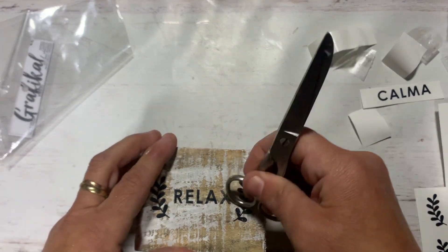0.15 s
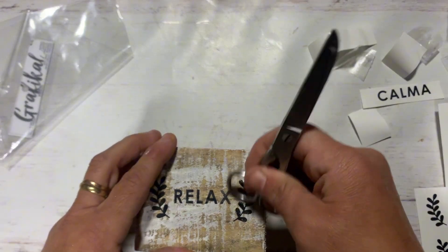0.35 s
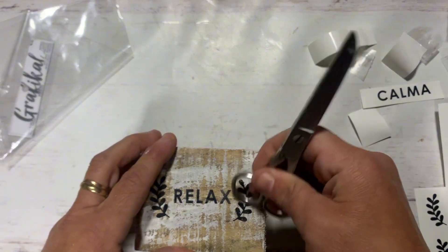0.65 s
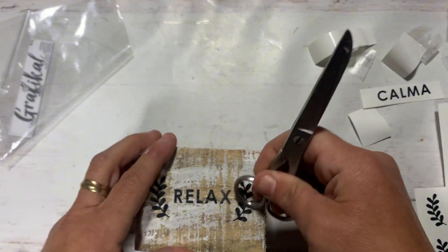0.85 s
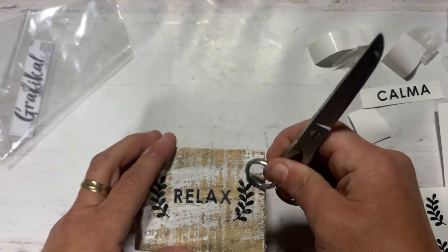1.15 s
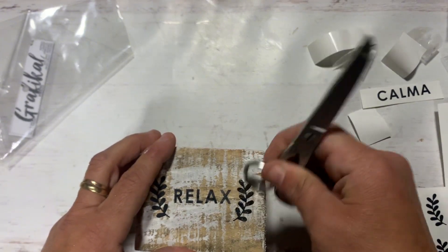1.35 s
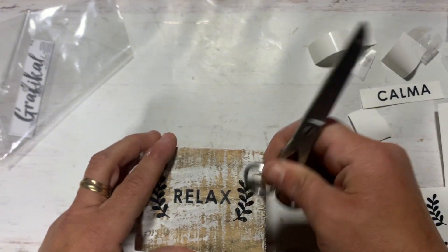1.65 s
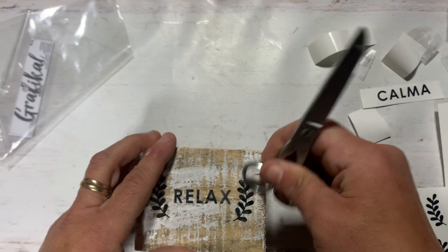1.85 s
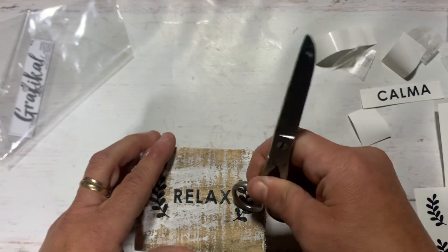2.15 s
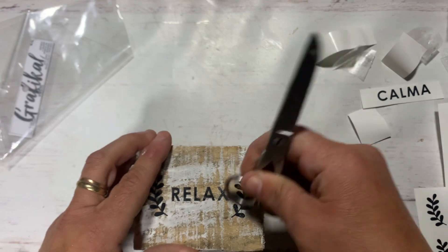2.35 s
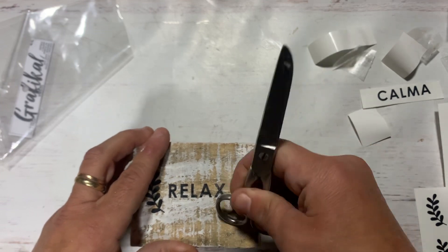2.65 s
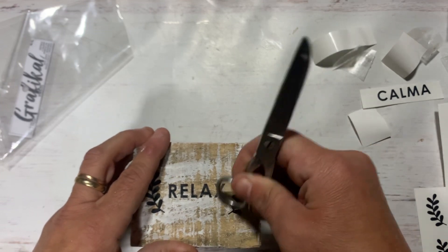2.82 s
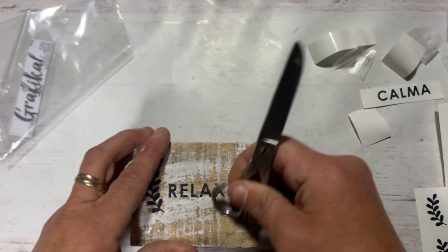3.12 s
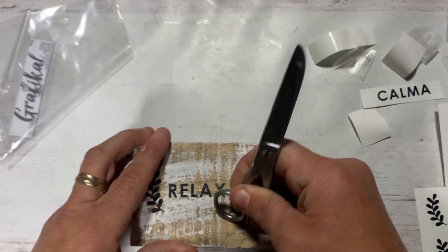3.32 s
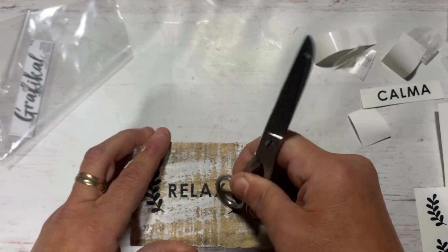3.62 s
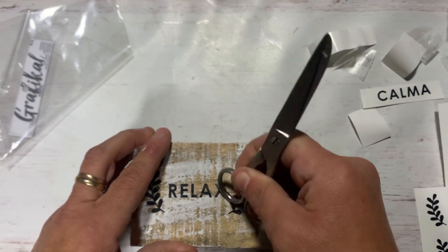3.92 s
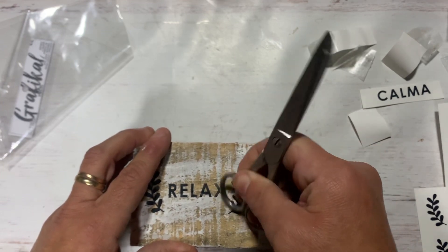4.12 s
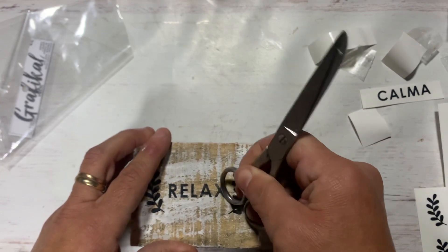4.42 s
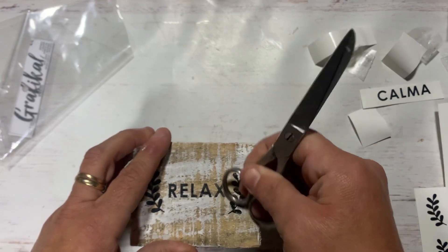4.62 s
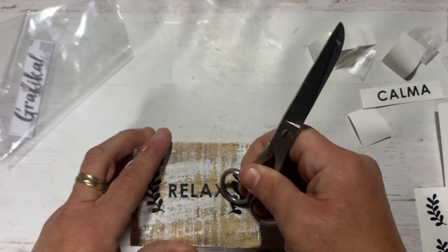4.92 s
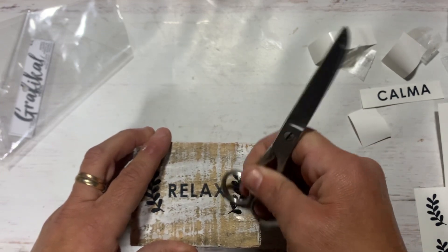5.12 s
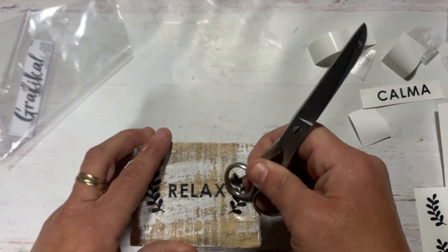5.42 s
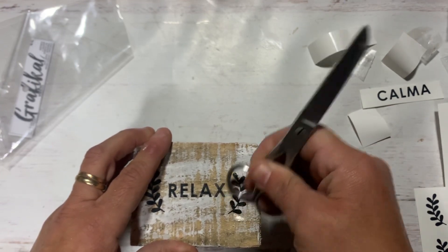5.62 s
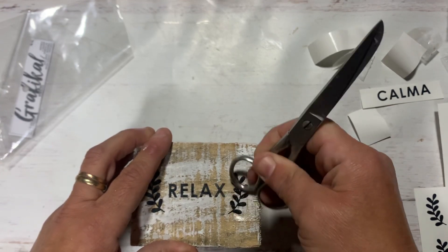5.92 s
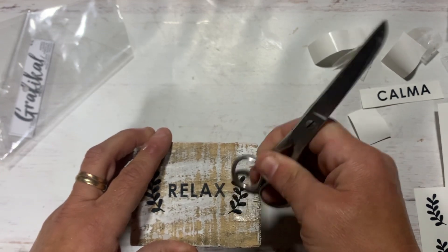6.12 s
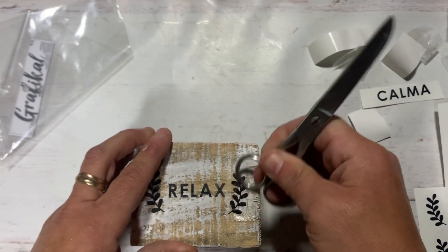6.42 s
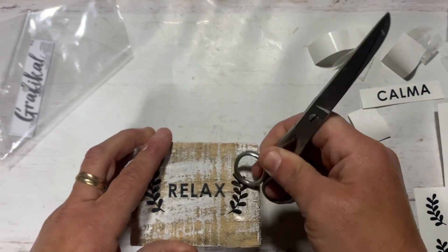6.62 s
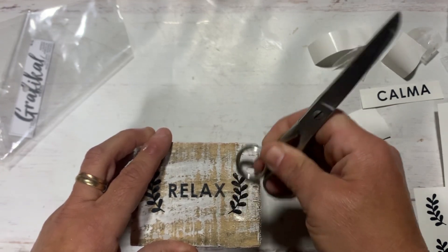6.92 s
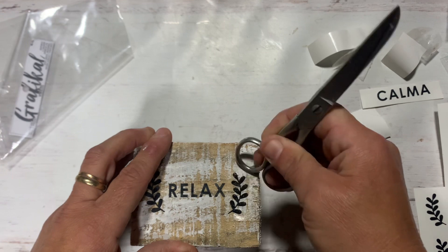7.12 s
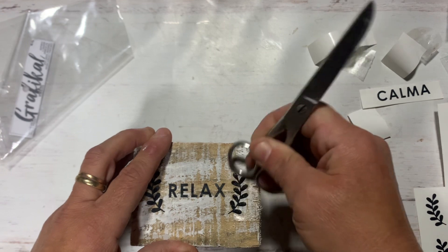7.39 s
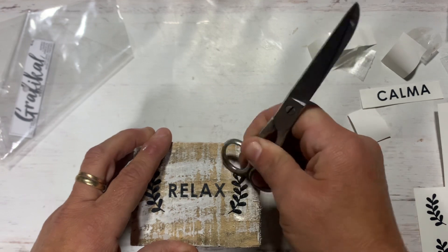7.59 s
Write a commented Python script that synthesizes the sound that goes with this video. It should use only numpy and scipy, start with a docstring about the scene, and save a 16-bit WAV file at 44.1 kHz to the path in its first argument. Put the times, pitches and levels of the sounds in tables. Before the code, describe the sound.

In a small quiet room, close to the microphone, a steel scissor handle rubs to and fro over a film decal on a wooden block, eight or nine short strokes a second, with tiny gaps between. Each stroke is a grainy, hollow wooden rasp with a thin metallic scrape and airy hiss. From 0 to 2.3 seconds the strokes are strong and uneven, with many woody knocks on ridges; a faint low hum wavers from about 0.5 to 2.3, finally sinking in pitch. Around 2.6 a hard cluster of clacks and bright film ticks stands out. From 2.7 the rubbing lightens, becoming very soft around 3.6 to 4.4 with few knocks. It gradually rebuilds from 4.6, and from 5.4 to about 7.3 it is firm and regular, with more knocks near 6.3 to 6.5, easing slightly at the end. Soft table rumble and occasional faint skin rustles run underneath, still rubbing at 7.7.

```python
"""Scissors rub to and fro over a vinyl decal on a wooden block, about eight strokes a second: the steel handle
scrapes, the wood rasps and the film hisses. The handle knocks on ridges, the film ticks, skin brushes past.
The table rumbles below in a small quiet room, close to a two-port microphone; early on a faint hum glides by.
Random slips, stick-slip chatter and sharp kicks drive banks of resonances of table, block, steel and film."""
import sys
import numpy as np
from scipy import signal
from scipy.fft import rfft, irfft, next_fast_len
from scipy.io import wavfile
from scipy.ndimage import uniform_filter1d

SR = 44100
rng = np.random.default_rng(int(sys.argv[2]) if len(sys.argv) > 2 else 0)


def materialize(psi):
    """Save the field psi as 16-bit PCM at rate SR to the path in sys.argv[1].

    A 1-D psi becomes a single channel; in a 2-D psi each row is a channel.
    """
    bounded = np.clip(np.atleast_2d(psi).T, -1, 1)
    quanta = np.round(bounded * 32767).astype(np.int16)
    wavfile.write(sys.argv[1], SR, quanta)


N = 341764
TIME = np.arange(N) / SR


def amp(db):
    """Decibels to gain."""
    return 10 ** (np.asarray(db) / 20)


def unit(x):
    """Scale to rms 1."""
    return x / np.sqrt(np.mean(x ** 2) + 1e-20)


def along(points, hz):
    """Read (Hz, value) points on a log frequency axis."""
    point_hz, values = np.transpose(points)
    return np.interp(np.log(hz + 1), np.log(point_hz), values)


def wobble(rate):
    """A wandering random curve of rms 1 with rate random points a second."""
    knots = rng.standard_normal(int(N * rate / SR) + 4)
    return unit(np.interp(TIME * rate, np.arange(len(knots)), knots))


def filtered(x, response):
    """Shape x by a complex response of frequency."""
    size = next_fast_len(N + SR // 2)
    spectrum = rfft(x, size) * response(np.fft.rfftfreq(size, 1 / SR))
    return irfft(spectrum, size)[..., :N]


def resonate(push, hz, width_hz):
    """One resonance rings when pushed."""
    return signal.lfilter(*signal.iirpeak(hz, hz / width_hz, fs=SR), push)


def asperities(per_second, spread_db):
    """Tiny slips at random moments, of very unequal size; rms 1."""
    happens = rng.random(N) < per_second / SR
    size_db = spread_db * np.clip(rng.standard_normal(N), -2.5, 2.5)
    return unit(happens * amp(size_db) * rng.choice([-1, 1], N))


def kicks(times, levels_db):
    """Single sharp pushes, one sample long."""
    force = np.zeros(N)
    force[np.round(np.asarray(times) * SR).astype(int)] = amp(levels_db)
    return force


def pace(start, fastest, end):
    """The samples of one movement and its speed (0-1), from rest to rest."""
    span = slice(max(int(start * SR), 0), int(end * SR))
    progress = np.interp(TIME[span], [start, fastest, end], [0, .5, 1])
    return span, np.abs(np.sin(np.pi * progress))


def swells(moves, sharpness):
    """Friction grows with speed: one gain curve for each level column after the three times."""
    power = np.zeros((len(moves[0]) - 3, N))
    for start, fastest, end, *levels_db in moves:
        span, speed = pace(start, fastest, end)
        power[:, span] += (amp(levels_db)[:, None] * speed ** sharpness) ** 2
    return np.sqrt(power)


def body(force, modes, low_hz, high_hz, wander_db, lean_db=0, clack_db=-35):
    """Modes driven by a force; each takes more or less of it as the contact point moves."""
    hz, width, db = np.transpose(modes)
    energy = amp(db) ** 2 * width
    centre = np.average(hz, weights=energy)
    # the spot under the contact answers at once with a dead clack, before the modes build up
    clack_width = .4 * centre
    motion = resonate(amp(clack_db) * force, centre, clack_width)
    for k in range(len(hz)):
        share_db = db[k] + lean_db * np.log2(hz[k] / centre) + wander_db * wobble(rate=22)
        motion += (-1) ** k * resonate(amp(share_db) * force, hz[k], width[k])
    radiation = signal.butter(3, [low_hz, high_hz], "band", fs=SR, output="sos")
    total_energy = energy.sum() + amp(clack_db) ** 2 * clack_width
    return signal.sosfilt(radiation, motion) / np.sqrt(total_energy * np.pi / SR)


# Strokes of the handle. Each row: start in seconds, length in seconds, strength in dB, bite of the
# steel's edge in dB, drag on the film in dB, lean of the spot towards high modes in dB per octave.
HANDLE_STROKES = [(-0.02, 0.083, -48.5, 5, 2.5, -8), (0.096, 0.088, -44.5, 0, -1.5, 10.5),
                  (0.227, 0.063, -48.5, 4.5, 5, -11.5), (0.339, 0.087, -43, -2.5, -3.0, 7.5),
                  (0.452, 0.075, -44.5, 5, 3, 2), (0.541, 0.11, -46, -0.5, -3, 6.5),
                  (0.687, 0.069, -45.5, 4.5, 6, -2), (0.784, 0.086, -42.5, -3, -4.5, 14),
                  (0.9, 0.08, -43, 1, 2.0, 5.5), (1.002, 0.083, -46, 2.5, 7, 13.0),
                  (1.13, 0.068, -43.5, 3, 7, -0.5), (1.227, 0.064, -35, -3.5, -5.5, 16),
                  (1.346, 0.083, -43.5, 4, 2, 8), (1.425, 0.084, -42, -3.5, -7.5, -7),
                  (1.561, 0.074, -45.5, 4, 4.5, 8), (1.658, 0.094, -40.5, -1, -3.5, 14),
                  (1.775, 0.081, -47, -0.5, 2.0, -7), (1.88, 0.075, -42, -1.5, 0.5, 3),
                  (2.014, 0.073, -40, -2.0, -3, 9.5), (2.103, 0.078, -43.5, -2.5, -4, 6.5),
                  (2.219, 0.064, -52, -0.5, 8, -7), (2.349, 0.064, -45, -11.5, 6.5, -5),
                  (2.473, 0.086, -59.5, -3.5, 5.5, -5), (2.612, 0.079, -35, -9, -3, -15),
                  (2.715, 0.089, -49, -2, 8.0, 5), (2.838, 0.068, -49, -3.5, 5, 13),
                  (2.955, 0.057, -52.5, -1, 7, 4), (3.041, 0.073, -46, -1, 11.5, 4.5),
                  (3.148, 0.081, -51.5, -2, 9.5, -4), (3.247, 0.078, -44, -5, -3, -8),
                  (3.379, 0.096, -46.5, -2, 4, -5), (3.472, 0.083, -46, -1.5, -4, 11),
                  (3.601, 0.086, -61.5, 4.5, 4, 1), (3.707, 0.085, -53, -0.5, 7, 4),
                  (3.85, 0.073, -51.0, 0.5, -4, -12), (3.961, 0.075, -54, 3, 2.5, -2),
                  (4.111, 0.087, -62, 3.5, 1, -7), (4.217, 0.086, -58.5, 3.5, 8, -11),
                  (4.356, 0.086, -55.5, -1, -7, -6.5), (4.475, 0.085, -55, 3.5, 1.0, 2.0),
                  (4.611, 0.072, -50.5, -0.5, -6.5, -12.5), (4.722, 0.08, -48.5, -2, 0, -2),
                  (4.87, 0.065, -49, 1, -3, -8), (4.976, 0.083, -49.5, 0.5, -4, 3),
                  (5.123, 0.061, -47.5, 1.5, -1.0, -5), (5.196, 0.12, -50.5, -1, 1, 1.5),
                  (5.367, 0.067, -47.5, 5.5, 1, -7.5), (5.474, 0.084, -43.5, -3.5, 0.5, 7),
                  (5.618, 0.081, -43, 2.5, 3, -10), (5.735, 0.099, -44.5, -4.5, -4.5, 2),
                  (5.864, 0.074, -44, -1, -0.5, -9.5), (5.959, 0.11, -45, -3.5, -6, 5),
                  (6.102, 0.075, -43.5, 2.5, 3, -16.5), (6.213, 0.09, -43.5, 0, -2, -3),
                  (6.35, 0.071, -41.0, 3.5, 3, -8), (6.459, 0.083, -41.5, -1.5, -1, 8),
                  (6.592, 0.073, -44.5, 7, 4.5, -15.5), (6.709, 0.088, -42.5, -6.5, -3.5, 9),
                  (6.836, 0.095, -46.5, 6.5, 3.5, -7.0), (6.957, 0.077, -43.0, 0.5, -3.5, 1),
                  (7.079, 0.091, -47.0, 9.5, 1.5, -6), (7.19, 0.078, -45, 3.5, 2, -4.5),
                  (7.301, 0.096, -50.5, 7.5, -1, -6), (7.421, 0.085, -43.5, -1, -9.5, 4.5),
                  (7.546, 0.095, -51, 2.5, 4, -6), (7.648, 0.096, -52.5, 3, 2, 6)]


def movements():
    """Start, fastest moment and end of every stroke; the handle is fastest just past halfway."""
    return [(start, start + .52 * length, start + length) for start, length, *_ in HANDLE_STROKES]


def handle_speed():
    """Speed of the handle (0-1) through all the strokes."""
    return swells([(*move, 0) for move in movements()], sharpness=0.71)[0]


# How the mode balance of table, block and rasp, in turn, follows the spot. Each row: lean at rest
# in dB per octave, share of the spot's lean, added lean at full speed in dB per octave.
LEAN_FOLLOW = [(-0.5, 0.33, 4.5), (-3.5, 0.95, 1.5), (-1, -0.49, 1)]


def leans():
    """Tilt across the modes of table, block and rasp, from the spot each stroke presses and the speed."""
    start, length, *_, lean_db = np.transpose(HANDLE_STROKES)
    spot_db = np.interp(TIME, start + length / 2, lean_db)
    speed = handle_speed()
    return [rest_db + share * spot_db + fast_db * speed for rest_db, share, fast_db in LEAN_FOLLOW]


# Spectrum of the room air. Each row: frequency in Hz, relative level in dB per Hz.
AIR_SPECTRUM = [(20, -38), (45, 7), (125, -8), (300, -12.5), (900, -36), (2000, -37.5), (4500, -36),
                (6500, -39), (15000, -41)]


def room_tone():
    """Steady, mostly low noise of the air in the room, a little different at each port."""
    air = rng.standard_normal(N) + 0.028 * rng.standard_normal((2, N))
    return amp(-60.0) * unit(filtered(air, lambda hz: amp(along(AIR_SPECTRUM, hz))))


# The gliding hum, perhaps an engine outside. Each row: time in seconds, pitch in Hz, level in dB;
# pitch and level waver a little around these points.
HUM_GLIDE = [(.46, 152, -75), (.58, 157.8, -48), (.7, 162.7, -48.5), (.84, 154, -53), (1.001, 157.9, -50),
             (1.071, 142.4, -46), (1.14, 119.9, -49), (1.22, 110, -50), (1.3, 115.4, -40),
             (1.381, 128.7, -49), (1.48, 139.7, -73), (1.55, 160.4, -57), (1.61, 157.3, -45.5),
             (1.69, 150.9, -47), (1.8, 147.2, -56), (1.92, 146.8, -47.5), (2.0, 119.6, -51),
             (2.07, 90.26, -52), (2.16, 76, -46), (2.301, 72.16, -78)]


def hum():
    """A faint, slightly unsteady low tone with one weak overtone."""
    s, hz, db = np.transpose(HUM_GLIDE)
    pitch_hz = np.interp(TIME, s, hz) * np.exp(.008 * wobble(29.45))
    phase = 2 * np.pi * np.cumsum(pitch_hz) / SR
    sounding = (TIME > s[0]) & (TIME < s[-1])
    level = amp(np.interp(TIME, s, db) + 1.1 * wobble(20))
    tone = unit(np.sin(phase) + amp(-10.5) * np.sin(2 * phase))
    return sounding * level * tone


# Reverb tail of the walls. Each row: frequency in Hz, time to decay by 60 dB in seconds.
WALL_DECAY = [(100, 0.65), (450, 0.43), (1000, 0.33), (3000, 0.088), (14000, 0.029)]


def room(x, low_db, mid_db, high_db):
    """The walls answer with a decaying noise tail of its own at each port, shorter in the treble."""
    hz, t, z = signal.stft(rng.standard_normal((2, SR // 3)), SR, nperseg=256)
    t60 = along(WALL_DECAY, hz)[:, None]
    tail = signal.istft(z * amp(-60 * t / t60) / np.sqrt(t60), SR, nperseg=256)[1]
    # the first reflection arrives 1/300 s late
    echo = np.pad(tail / np.linalg.norm(tail[0]), ((0, 0), (SR // 300, 0)))
    wet = signal.fftconvolve(x[None], echo, axes=1)[:, :N]
    colour = [(200, low_db), (650, mid_db), (4000, high_db)]
    return filtered(wet, lambda hz: amp(along(colour, hz)))


# The resting hands keep the table rumbling. Each row: time in seconds, level in dB before a 1 dB cut.
HAND_REST = [(0.0, -50.5), (0.62, -50), (1.2, -42), (1.6, -52), (2.6, -47), (3.43, -50), (3.75, -56.5),
             (5.48, -50.5), (6.04, -47.5), (7.42, -51.5), (7.75, -49.5)]


def rocking():
    """Gain of the rumble: resting hands, plus a swell just behind each stroke that grows with strength."""
    strength_db = np.transpose(HANDLE_STROKES)[2]
    rock_db = -49 + 0.75 * (strength_db - strength_db.mean())
    lag_s = 0.016
    rocks = swells(np.column_stack([np.add(movements(), lag_s), rock_db]), sharpness=1.56)[0]
    hands = amp(-1 + np.interp(TIME, *np.transpose(HAND_REST)))
    return np.hypot(rocks, hands)


# Modes of the table top. Each row: frequency in Hz, width in Hz, relative level in dB.
TABLE_MODES = [(75.4, 38, -4), (118.8, 9.9, 2.5), (144.6, 25.6, -2.5), (170, 16.6, -4.5), (190.7, 21, -9)]


def rumble(thuds, lean_db):
    """Noise makes the table modes boom softly while the block rocks on it; thuds ring the same modes."""
    boom = body(rng.standard_normal(N), TABLE_MODES, low_hz=47.7, high_hz=245, wander_db=2.0,
                lean_db=lean_db, clack_db=-18.5)
    # even out the boom over about 50 ms, so that the rocking sets its level
    swell = np.sqrt(np.abs(uniform_filter1d(boom ** 2, size=2200)) + 0.001)
    thud = body(thuds, TABLE_MODES, low_hz=68.6, high_hz=224, wander_db=0.5, clack_db=-0.5)
    return rocking() * boom / swell + thud


# Spectrum of the skin's rustle. Each row: frequency in Hz, relative level in dB per Hz.
SKIN_SPECTRUM = [(500, -10), (1300, 5), (2400, 1.5), (4200, 4.5), (5500, -0.5), (7000, -2), (9000, -20),
                 (15000, -10)]
# The side of the hand brushes along. Each row: start in seconds, fastest moment in seconds, end in
# seconds, level in dB before a 0.5 dB cut, squeak in Hz. A row that ends before it starts is silent.
HAND_BRUSHES = [(1.203, 1.417, 1.7, -72.5, 1810), (2.42, 2.472, 2.52, -67.5, 6300),
                (2.68, 2.717, 2.9, -73.5, 4600), (3.385, 3.435, 3.524, -60, 1980),
                (4.638, 4.685, 4.7, -71, 2903), (5.183, 5.21, 5.29, -75, 2201),
                (5.61, 5.659, 5.54, -60, 2300), (6.642, 6.69, 6.8, -73.5, 3092)]


def brushing():
    """Skin slides with a soft rustle of tiny slips, each time with a faint resonant noisy squeak."""
    slips = asperities(per_second=5400, spread_db=-1.0)
    rustle = unit(filtered(slips, lambda hz: amp(along(SKIN_SPECTRUM, hz))))
    out = np.zeros(N)
    for start, fastest, end, db, hz in HAND_BRUSHES:
        span, speed = pace(start, fastest, end)
        squeak = unit(resonate(rng.standard_normal(SR), hz, width_hz=490))
        skin = rustle[span] + amp(-3.5) * squeak[:len(speed)]
        out[span] += amp(db - 0.5) * speed ** 1.9 * skin
    return out


# The film ticks under the steel. Each row: time in seconds, level in dB before the share that steel
# and film take, decay time constant of the crumble's power in milliseconds.
FILM_TICKS = [(0.7095, -56, 1.5), (1.056, -52, 1.2), (1.1544, -44, .5), (1.3815, -41, 1.92),
              (1.5863, -56, 2), (2.0504, -46, 1.74), (2.376, -43.5, 2.6), (2.6337, -56, 1.9),
              (2.6505, -29, 6), (2.6725, -28, 0.58), (2.68, -47, 1.63), (2.7834, -51, 1),
              (2.8729, -46, 1.5), (3.0473, -53, 1.16), (3.0638, -49, 3), (3.0937, -47, 1.97),
              (3.2043, -48, 1.5), (3.307, -52.5, 1.47), (3.346, -64, 0.99), (3.896, -43, 4),
              (4.3105, -57, 0.34), (4.7275, -52, 1), (4.9909, -55, 0.98), (5.5174, -42, 1.5),
              (5.5483, -51, 1.96), (6.3659, -49, 1.52), (6.7286, -58, 1.04), (7.1904, -48.5, 0.95)]


def ticks():
    """Forces on steel and film: each snap is a sharp kick that crumbles away in a few milliseconds."""
    s, db, life_ms = np.transpose(FILM_TICKS)
    ms = 1000 * np.arange(SR // 20) / SR
    power = np.zeros(N)
    for at, level_db, life in zip(s, db, life_ms):
        decay = np.exp(-ms / life)
        power[round(at * SR):][:len(ms)] += amp(level_db) ** 2 * decay / decay.sum()
    crumble = asperities(per_second=13000, spread_db=6) * np.sqrt(power)
    snap = 0.86 * kicks(s, db) + crumble
    return amp(1) * snap, amp(12.5) * snap


# The handle bumps over a ridge. Each row: time in seconds, level in dB before the share that each
# body takes, hardness in dB.
RIDGE_BUMPS = [(0.15, -27, 3), (0.249, -36, 14.5), (0.384, -24, -1), (0.477, -34, 11), (0.834, -28, -8),
               (1.037, -26.5, -2), (1.155, -31, -1), (1.256, -28.5, 7), (1.38, -25.5, 11.5),
               (1.585, -30, 7), (1.708, -26.5, -10), (1.813, -34.5, -14), (1.912, -22.5, 0.5),
               (2.052, -26.5, 6), (2.139, -22, -1), (2.38, -32.5, -26), (2.6165, -33, 3), (2.643, -33, 16),
               (2.651, -25.5, 8), (2.668, -32, -36.5), (2.782, -28.5, 3.5), (2.987, -33.5, 0),
               (3.052, -33, 4), (3.989, -33.5, -20), (4.744, -33, -12), (5.513, -26, 5.5),
               (6.256, -26.5, -1), (6.37, -32, 10), (6.406, -33.5, 3), (6.491, -27.5, 5), (6.995, -32, 11)]


def bumps():
    """Forces on table, block and rasp modes: soft bumps thud, all knock, hard ones clack."""
    s, db, hard_db = np.transpose(RIDGE_BUMPS)
    thud = kicks(s, db + 10 - 0.58 * hard_db)
    knock = kicks(s, db + 16)
    clack = kicks(s, db + 0.5 + hard_db)
    return thud, knock, clack


def catches(surge_db, hold_s):
    """Friction gain: it surges when the handle meets a ridge and is slightly lighter just around it."""
    onsets = kicks([row[0] for row in RIDGE_BUMPS], 0)
    surge = signal.lfilter([1], [1, -np.exp(-1 / (hold_s * SR))], onsets)
    return amp(surge_db * (surge - uniform_filter1d(surge, size=4400)))


def chatter(slow_hz, fast_hz, jitter):
    """Stick-slip pulses, rms 1, whose rate bends up and down with the speed of each stroke."""
    rate = np.full(N, float(slow_hz))
    own_rates = rng.uniform(.7, 1.3, len(HANDLE_STROKES))
    for (start, fastest, end), own in zip(movements(), own_rates):
        span, speed = pace(start, fastest, end)
        rate[span] = own * (slow_hz + (fast_hz - slow_hz) * speed)
    cycles = np.cumsum(rate * np.exp(jitter * wobble(200))) / SR
    slips = np.diff(np.floor(cycles), prepend=0)
    return unit(slips * amp(1.86 * rng.standard_normal(N)))


# What a stroke gives to block, rasp modes, steel and film, in turn. Each row: level over the
# stroke's strength in dB, dB per dB of bite, dB per dB of drag.
STROKE_DRIVE = [(0, 0, 0), (-7.5, 1, 0), (-21.5, 0.49, 0.24), (-24.5, 0, 1)]


def stroke_drive():
    """Levels of block, rasp, steel and film per stroke: bite makes it rasp, drag makes the film hiss."""
    _, _, strength_db, bite_db, drag_db, _ = np.transpose(HANDLE_STROKES)
    return [strength_db + db + per_bite * bite_db + per_drag * drag_db
            for db, per_bite, per_drag in STROKE_DRIVE]


def rubbing():
    """Forces on block, rasp, steel and film: coarse grain and chatter shake wood, finer slips hiss."""
    block_db, *scrape_db = stroke_drive()
    lag_s = 0.0038  # the block is shaken a little later than the steel scrapes
    block, = swells(np.column_stack([np.add(movements(), lag_s), block_db]), sharpness=0.75)
    rasp, steel, film = swells(np.column_stack([movements(), *scrape_db]), sharpness=0.97)
    # the contact pressure flutters over the grain
    flutter = unit(amp(2.12 * wobble(170) + 1.39 * wobble(75)))
    grip = catches(surge_db=5.5, hold_s=0.0017) * flutter
    grain = asperities(per_second=2500, spread_db=4)
    stick_slip = chatter(slow_hz=55.11, fast_hz=134.74, jitter=.3)
    coarse = grip * unit(grain + 0.82 * stick_slip)
    fine = grip * asperities(per_second=7000, spread_db=5.0)
    scrape = unit(fine + 0.66 * coarse)
    hiss = unit(fine + 0.3 * coarse)
    return block * coarse, amp(0.93) * rasp * coarse, amp(2.5) * steel * scrape, amp(1.0) * film * hiss


# Low modes of the block. Each row: frequency in Hz, width in Hz, relative level in dB.
BLOCK_MODES = [(243.8, 16, -3.5), (268.8, 8.5, 0.5), (316.5, 6.6, -11), (339.3, 12.4, -4.5), (378, 36, -10),
               (409.8, 17.4, -1.5), (451.4, 8.3, -2.5), (488, 12.3, -8), (497, 11.5, -7.5), (588, 54, -11),
               (591, 19.5, -12.5)]


def wooden_block(force, lean_db):
    """The low modes of the wood ring with the coarse rubbing and the knocks."""
    return body(force, BLOCK_MODES, low_hz=181, high_hz=716, wander_db=2.5, lean_db=lean_db, clack_db=-7.0)


# High modes of the block. Each row: frequency in Hz, width in Hz, relative level in dB.
RASP_MODES = [(705, 45, -3.5), (783, 23.6, -4), (929, 70, -3.5), (968.6, 48.6, -4), (983, 39, -6),
              (1111.5, 96, -2.5), (1165.5, 65, -6), (1278, 94, -11), (1381, 75, -14), (1540, 145, -17.5),
              (1546, 44, -21), (1790, 88, -24.5)]


def wood_rasp(force, lean_db):
    """The high modes of the wood rasp and clack."""
    return body(force, RASP_MODES, low_hz=623, high_hz=1713, wander_db=3.0, lean_db=lean_db, clack_db=-12.0)


# Modes of the scissors. Each row: frequency in Hz, width in Hz, relative level in dB.
STEEL_MODES = [(2430, 4400, -18), (3105, 160, -2), (3480, 520, -8.5), (3970, 213, -1), (4490, 710, -7),
               (5590, 450, -12), (5904, 87, -8)]


def scissors(force):
    """The steel rings with the scrape and the ticks."""
    return body(force, STEEL_MODES, low_hz=1810, high_hz=6170, wander_db=3.5)


# Modes of the film under the handle. Each row: frequency in Hz, width in Hz, relative level in dB.
FILM_MODES = [(7460, 1800, -7.5), (7160, 600, -15.5), (9970, 230, -7.5), (11370, 1050, -5.5),
              (12500, 380, -11), (13000, 330, 5.5), (14600, 900, -1.5), (15500, 230, -10)]


def vinyl_film(rub, tick):
    """The film hisses under the rub and snaps at the ticks."""
    hiss = body(rub, FILM_MODES, low_hz=6150, high_hz=19200, wander_db=3.0)
    snaps = body(tick, FILM_MODES, low_hz=8130, high_hz=16700, wander_db=1.0, clack_db=-5)
    return hiss + snaps


def scene():
    """Rubbing, bumps, ticks, rumble and brushing in the room, over the hum and the room tone."""
    rub_block, rub_rasp, rub_steel, rub_film = rubbing()
    bump_table, bump_block, bump_rasp = bumps()
    tick_steel, tick_film = ticks()
    table_lean, block_lean, rasp_lean = leans()
    wood = wooden_block(rub_block + bump_block, block_lean) + wood_rasp(rub_rasp + bump_rasp, rasp_lean)
    contact = scissors(rub_steel + tick_steel) + vinyl_film(rub_film, tick_film)
    work = wood + contact + rumble(bump_table, table_lean) + brushing()
    walls = room(work, low_db=-19, mid_db=-4, high_db=-9)
    return amp(-0.36) * (work + walls) + hum() + room_tone()


# Timing between the microphone ports. Each row: frequency in Hz, lead of the left in radians.
PORT_LEAD = [(0, 0), (420, -.2), (650, .8), (950, .1), (1600, .4), (2500, 1.8), (3300, 1.2), (4600, 3),
             (5100, 3.4), (6400, 6), (7500, 6.6), (8400, 9), (13100, 15.7), (16000, 19.6)]
# Level between the ports. Each row: frequency in Hz, left minus right in dB.
PORT_TILT = [(60, -2.5), (110, 0), (200, -5), (380, 0), (700, -3.5), (1290, -1), (2380, 0), (4400, -0.5),
             (8120, -1.5), (15000, 1)]


def record(dry):
    """Two ports hear the scene with a small lead and tilt; nothing passes above the band limit."""
    side = np.array([[.5], [-.5]])
    top_hz = 15850

    def ports(hz):
        """Half of the lead and tilt goes to each side."""
        lead = np.interp(hz, *np.transpose(PORT_LEAD))
        return amp(side * along(PORT_TILT, hz)) * np.exp(1j * side * lead) * (hz < top_hz)

    return filtered(dry, ports)


dry = scene()
out = record(dry)
materialize(out)
```